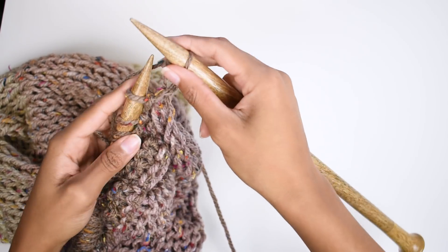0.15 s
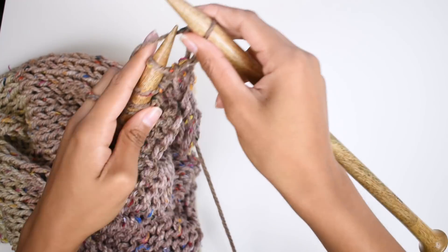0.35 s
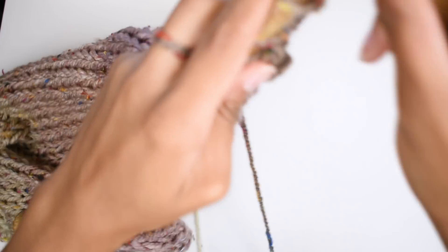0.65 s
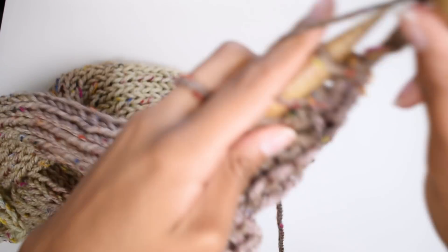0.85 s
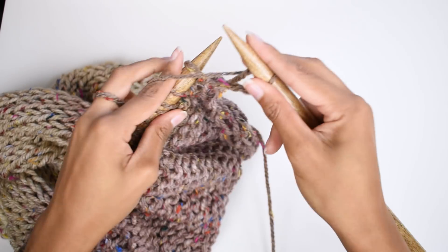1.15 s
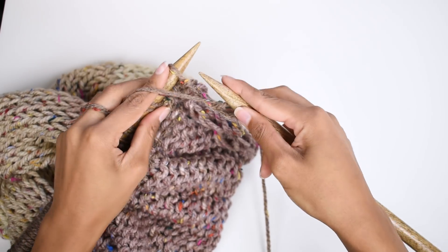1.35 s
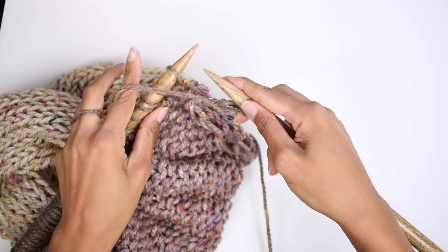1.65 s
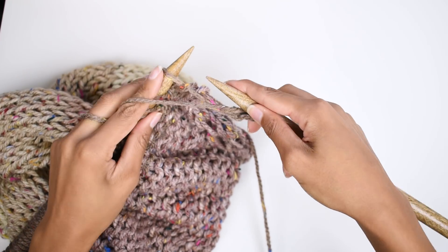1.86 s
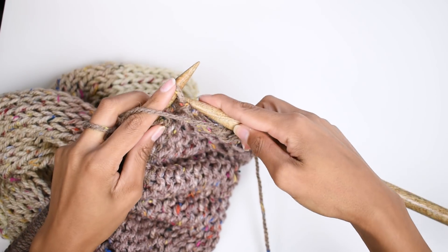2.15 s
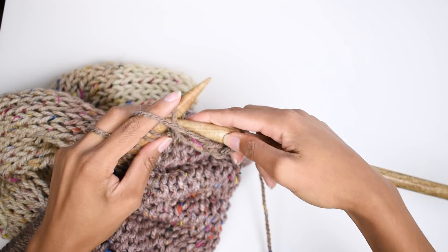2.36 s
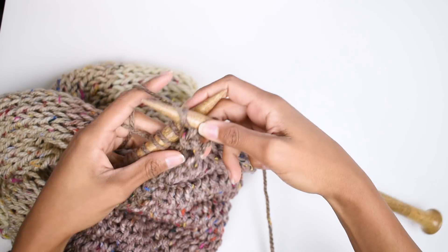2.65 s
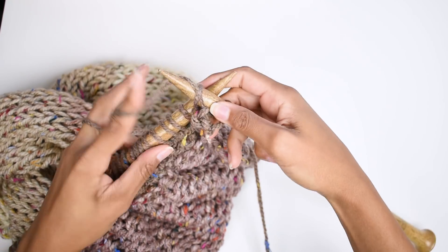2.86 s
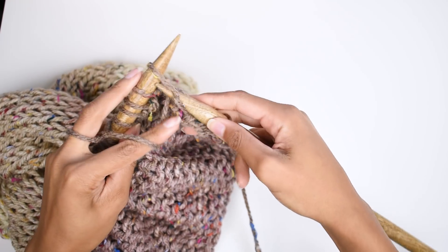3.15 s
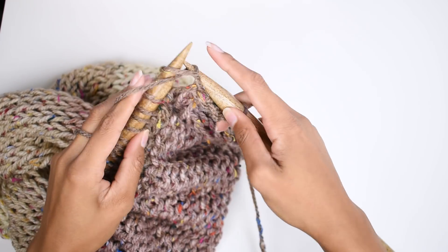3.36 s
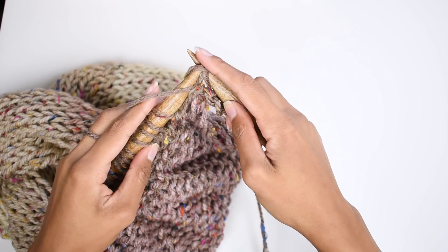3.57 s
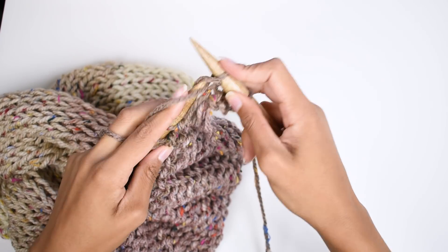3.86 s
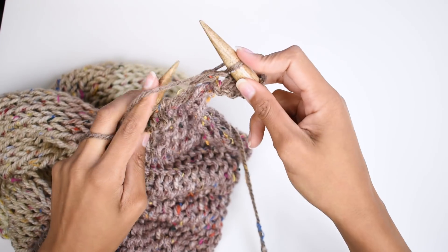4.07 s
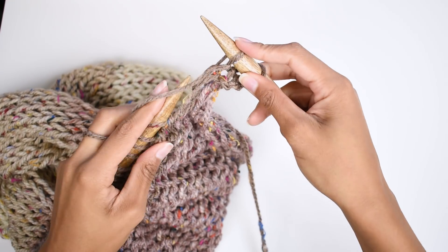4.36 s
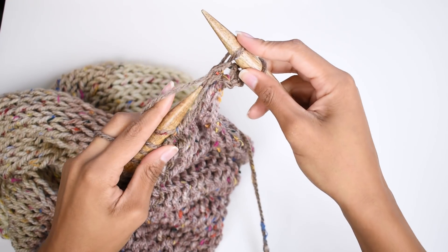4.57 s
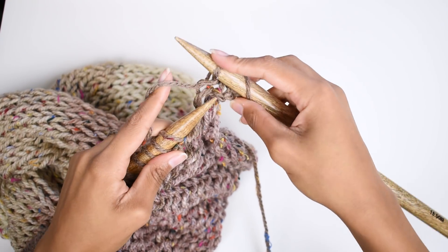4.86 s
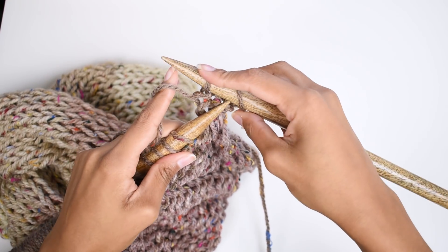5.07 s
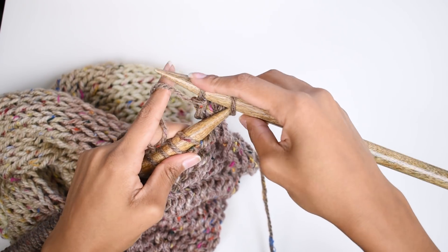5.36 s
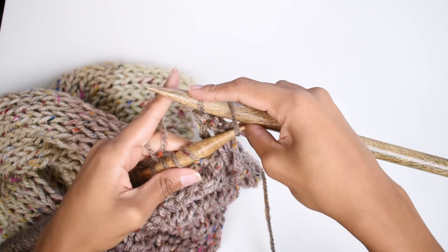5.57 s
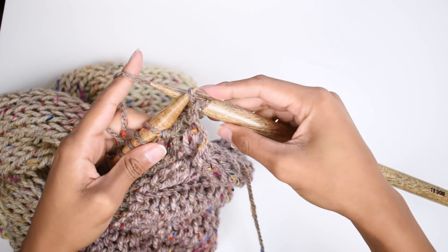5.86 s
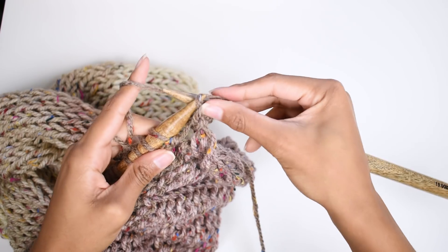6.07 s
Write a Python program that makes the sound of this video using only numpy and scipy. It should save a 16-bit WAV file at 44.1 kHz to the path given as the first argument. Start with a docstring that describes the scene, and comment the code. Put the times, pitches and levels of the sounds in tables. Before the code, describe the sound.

Thick wooden knitting needles knock and click irregularly, with hollow thumps on a table and faint swishes of yarn.

```python
"""Two thick wooden knitting needles at a table, close to the microphone in a small, quiet room.
First a tip clicks, yarn swishes over the wood, light ticks follow and the knitted cloth rustles.
From two seconds in the needles knock and slide: end knobs thump hollow on the table, tips and shafts click.
Near four seconds, blows cushioned by wool only thud; a knock and two faint ticks follow. After five
seconds come the last knocks, swishes and slides. Faint room rumble and microphone hiss lie under it all."""
import sys
import numpy as np
from scipy import signal
from scipy.fft import rfft, irfft, next_fast_len
from scipy.io import wavfile
from scipy.ndimage import map_coordinates

SR = 44100
rng = np.random.default_rng(int(sys.argv[2]) if len(sys.argv) > 2 else 0)


def inscribe(sig):
    """Save sig as 16-bit PCM at rate SR to the path in sys.argv[1].

    A 1-D sig is mono; a 2-D sig holds one channel per row.
    Samples are clipped to [-1, 1] before scaling.
    """
    pcm = np.round(np.clip(np.atleast_2d(sig).T, -1, 1) * 32767)
    wavfile.write(sys.argv[1], SR, pcm.astype(np.int16))


N = 273420

# Needles knock: end knobs thump hollow on the table, tips and shafts click.
# Each row: start in seconds, strength in dB, contact time in seconds, loss of the low modes in dB,
# favoured resonance in Hz, its boost in dB, seconds to the first rebound (0 for none).
NEEDLE_KNOCKS = [(0.434, -35, 0.000096, 8, 3240, 11, 0), (2.021, -17, .00018, 7.5, 885, 1.5, 0),
                 (2.689, -14.5, 0.00019, 8, 750, 6, 0), (3.1061, -21.5, 0.00013, 4.5, 600, 8, .0203),
                 (3.1094, -33, 0.00014, 2.5, 1130, 21, 0), (3.4304, -22, 0.000046, 33.5, 1230, 24, 0),
                 (3.705, -33.5, 0.0017, 4, 590, 2, 0), (3.821, -38.5, 0.002, 0, 142, 14.5, 0),
                 (3.994, -47.5, .0035, 0, 238, 7.5, 0), (4.2715, -24.5, 0.00011, 14, 1890, 7.5, .0398),
                 (5.3611, -34, 0.000046, 28, 1165, 21, 0), (5.6922, -13.5, 0.00016, 7, 765, 4, .0124),
                 (5.9205, -16.5, 0.000036, 37, 2370, 19, 0), (5.921, -32, 0.00068, 4, 674, 5, 0)]
# The hollow wooden ring of table and needles when struck.
# Each row: frequency in Hz, level in dB, seconds to fall by 60 dB.
WOOD_MODES = [(132, -27, 0.18), (239.2, -10, 0.098), (246, -16, 0.021), (436, -6, 0.017), (583, -29, 0.34),
              (620, 1, 0.032), (667, 12, 0.0062), (873.4, 6.5, 0.029), (867.4, -1, 0.058),
              (1000, -20.5, 0.073), (1297, -21, 0.028), (1553, -17, 0.029), (1955, -14.5, 0.021),
              (2240, -20, 0.032), (2460, -19, 0.0087), (3153, -13.5, 0.014), (3460, -17.5, 0.003),
              (4830, -31, 0.015), (4840, -25.5, 0.014), (6320, -32, 0.006)]
# A contact's force before its softness is counted. Each row: frequency in Hz, level in dB.
FORCE_SPECTRUM = [(60, -1), (150, 3.5), (240, 3.5), (750, -1.5), (1600, 2.5), (3000, -1.5), (5500, 0.5)]
# Tips and fingernails. Each row: start in seconds, level in dB, pitch in Hz, ring against scratch in dB.
TIP_TICKS = [(1.2342, -53.5, 4930, 6.5), (1.2352, -56, 3560, 4), (1.257, -54.5, 3160, -3),
             (1.2637, -53.5, 6900, -10), (1.289, -55, 3020, -13), (1.2916, -50.5, 5400, -2),
             (1.9925, -55, 5080, -6), (2.15, -58.5, 4900, -7), (4.793, -63, 3050, -8),
             (5.0515, -64, 6100, 9)]
# Shaft dragging on shaft. Each row: middle and length in seconds, hollow level and groan level in dB.
SHAFT_SLIDES = [(2.249, 0.06, -64, -59), (3.238, 0.088, -60.5, -68), (5.844, 0.1, -53.5, -65),
                (6.195, 0.11, -61, -73)]
# Yarn drawn over the wood. Each row: middle and length in seconds, level in dB.
YARN_PULLS = [(0.878, 0.022, -69), (0.965, 0.062, -72.5), (1.032, 0.029, -68.5), (1.307, 0.25, -75.5),
              (1.999, 0.039, -68), (2.485, 0.17, -66), (3.225, 0.09, -65), (3.516, 0.18, -72.5),
              (5.60, 0.065, -64.5), (5.832, 0.17, -68.5)]
# Resonances of a rubbed needle. Each row: frequency in Hz, width in octaves, level in dB.
RUBBED_MODES = [(2190, 0.052, 6), (3140, 0.067, -2), (4540, 0.052, 5.5), (6080, 0.035, 4),
                (7600, 0.024, -6)]
# Echoes off the table and walls. Each row: frequency in Hz, gain in dB.
ECHO_COLOUR = [(200, -6.5), (450, -6.5), (750, -14), (1400, -7), (2100, -14), (3000, -16.5), (6000, -10)]
# The small room's tail. Each row: frequency in Hz, seconds to fall by 60 dB.
ROOM_DECAY = [(150, 0.11), (400, 0.31), (700, 0.32), (1600, 0.46), (4000, 0.49), (10000, 0.11)]
# Room rumble and microphone hiss. Each row: frequency in Hz, relative noise density in dB.
ROOM_TONE_SPECTRUM = [(10, -16), (20, -2.5), (49, -5.5), (110, 0), (230, -4.5), (450, -7), (620, -9),
                      (1600, -17.5), (2400, -19.5), (3400, -17), (4800, -17), (7500, -22), (15800, -23.5)]
# The room tone's stereo image. Each row: frequency in Hz, likeness of left and right from 0 to 1.
STEREO_LIKENESS = [(60, 0.92), (150, 0.98), (380, 0.96), (950, 0.93), (2380, 0.75), (5980, 0.75),
                   (15000, 0.08)]

SOFT_SLOPE = 3.2  # how steeply the force falls above 1 / contact time
TIP_KNEE, TIP_SLOPE = 0.083, 4.8  # low modes are lost below this share of 1 / contact time, this steeply
FLIGHT_SHRINK, SHORTEST_FLIGHT_S = 0.41, 0.011  # each flight over the last; no rebound below the shortest
LOSSLESS_FLIGHT_S = 0.066  # a rebound's strength is its flight over this
REBOUND_THINS_DB = 9  # further loss of low modes in the weakest rebounds
REBOUND_SOFTENS = 0.1  # a weaker rebound stays longer in contact, by this power
CRACK_HZ, FIRM_CONTACT_S, CRACK_RISES = 2460, 0.00011, 0.15  # shorter contacts crack higher, by this power
PULL_HZ, PULL_S, PULL_BRIGHTENS = 5660, 0.046, 0.19  # shorter yarn pulls sound higher, by this power
CLOTH_MIDDLE_S, CLOTH_LENGTH_S, CLOTH_DB, CLOTH_HZ = 1.46, 0.38, -74.5, 1440
TOP_HZ = 15850


def needle_knocks(resonance_q=12, soften_hz=8000):
    """Close to the microphone, each contact rings the wood and cracks; the wood's give dulls the top."""
    track, t = np.zeros(N), np.arange(SR // 4) / SR
    for start, db, contact_s, low_loss_db, favoured_hz, boost_db, flight_s in NEEDLE_KNOCKS:
        crack_hz = CRACK_HZ * (FIRM_CONTACT_S / contact_s) ** CRACK_RISES
        for s, gain in bounces(start, flight_s):
            crack = amp(-22) * scratch(t, centre_hz=crack_hz, octaves=0.77, t60=0.034)
            wood = wood_ring(scatter_db=0.98, detune=0.003) + crack
            thinning_db = low_loss_db + REBOUND_THINS_DB * (1 - gain)
            pulse = amp(db) * gain * contact_force(contact_s / gain ** REBOUND_SOFTENS, thinning_db)
            blow = signal.fftconvolve(wood, pulse)
            # the point of contact picks out one resonance of the wood
            favoured = signal.lfilter(*signal.iirpeak(favoured_hz, resonance_q, SR), blow)
            blow += (amp(boost_db * gain) - 1) * favoured
            add(track, s, in_room(blow, late_db=-5.5))
    return signal.lfilter(*signal.butter(2, soften_hz, fs=SR), track)


def wood_ring(scatter_db, detune):
    """Table and needles ring hollow, a little differently each blow; neighbouring modes start opposed."""
    t = np.arange(SR // 4) / SR
    tuning = 1 + detune * rng.standard_normal()
    gains = amp(scatter_db * rng.standard_normal(len(WOOD_MODES)))
    return sum((-1) ** k * gains[k] * amp(db) * fade(t, t60) * np.sin(2 * np.pi * hz * tuning * t)
               for k, (hz, db, t60) in enumerate(WOOD_MODES))


def contact_force(contact_s, low_loss_db):
    """One contact's pulse: its duration limits the treble, its nearness to the tip thins the bass."""
    hz = np.geomspace(40, 16000, num=48)
    cycles = hz * contact_s
    softness_db = 10 * np.log10(1 + cycles ** SOFT_SLOPE)
    thinning_db = low_loss_db / (1 + (cycles / TIP_KNEE) ** TIP_SLOPE)
    return shortest_pulse(np.column_stack([hz, along(FORCE_SPECTRUM, hz) - softness_db - thinning_db]))


def bounces(s, flight_s, count=3):
    """Start and gain of a blow and of a loose needle's rebounds, which come ever sooner and weaker."""
    contacts = [(s, 1)]
    for flight in flight_s * FLIGHT_SHRINK ** np.arange(count):
        if flight > SHORTEST_FLIGHT_S:
            s += flight
            contacts.append((s, flight / LOSSLESS_FLIGHT_S))
    return contacts


def scratch(t, centre_hz, octaves, t60):
    """A dry, dying burst of noise as two surfaces meet and skid."""
    band = hump(np.fft.rfftfreq(len(t), 1 / SR), centre_hz, octaves)
    noise = irfft(rfft(rng.standard_normal(len(t))) * band, len(t))
    return unit(noise) * fade(t, t60)


def tip_ticks():
    """A tip touches: a dry scratch with more or less of a very short, high ring."""
    track, t = np.zeros(N), np.arange(SR // 20) / SR
    for s, db, hz, ring_db in TIP_TICKS:
        ring = amp(ring_db) * np.sin(2 * np.pi * hz * t) * fade(t, t60=0.025)
        tick = ring + scratch(t, centre_hz=hz, octaves=0.41, t60=0.01)
        add(track, s, amp(db) * in_room(tick, late_db=-5))
    return track


def shaft_slides():
    """Wood dragging on wood stirs a hollow resonance and a low groan."""
    hollow_swell = sum(amp(db) * stroke(s, length) for s, length, db, _ in SHAFT_SLIDES)
    groan_swell = sum(amp(db) * stroke(s, length) for s, length, _, db in SHAFT_SLIDES)
    rub = friction(catch_hz=250, grain_db=-1)
    hollow = filtered(rub, lambda hz: hump(hz, 640, 0.11) + amp(-11) * hump(hz, 790, 0.61))
    groan = filtered(rub, lambda hz: hump(hz, 230, 0.036))
    return hollow_swell * unit(hollow) + groan_swell * unit(groan)


def yarn_swishes():
    """Wool fibres brush the needles and stir their high resonances; a quicker pull sounds higher."""
    track = np.zeros(N)
    fibres = filtered(friction(catch_hz=570, grain_db=2), rubbed_needle)
    for s, length, db in YARN_PULLS:
        centre_hz = PULL_HZ * (PULL_S / length) ** PULL_BRIGHTENS
        swish = filtered(fibres, lambda hz: hump(hz, centre_hz, octaves=0.95))
        track += amp(db) * stroke(s, length) * unit(swish)
    return track


def rubbed_needle(hz):
    """The gain that a needle's resonances give to friction on its surface."""
    return 1 + sum(amp(db) * hump(hz, mode_hz, octaves) for mode_hz, octaves, db in RUBBED_MODES)


def cloth_rustle():
    """The knitted piece rustles softly as the hands settle."""
    rustle = filtered(friction(catch_hz=120, grain_db=2.5), lambda hz: hump(hz, CLOTH_HZ, octaves=0.7))
    return amp(CLOTH_DB) * stroke(CLOTH_MIDDLE_S, CLOTH_LENGTH_S) * unit(rustle)


def friction(catch_hz, grain_db):
    """Noise whose strength jumps as the surfaces catch and let go."""
    catches = rng.standard_normal(int(N * catch_hz / SR) + 4)
    grip = map_coordinates(catches, [np.arange(N) * catch_hz / SR])
    return unit(rng.standard_normal(N) * amp(grain_db * grip))


def stroke(s, length):
    """A hand movement swells and dies away around second s."""
    return np.exp(-np.pi * ((np.arange(N) / SR - s) / length) ** 2)


def in_room(sound, late_db, early_t60=0.13, delay_s=0.009):
    """The microphone hears the direct sound, then echoes off the table and near walls, and a tail."""
    hz, frame_s, spectra = signal.stft(rng.standard_normal(SR // 2), SR, nperseg=256)
    _, tail = signal.istft(spectra * fade(frame_s, along(ROOM_DECAY, hz)[:, None]), SR, nperseg=256)
    early = rng.standard_normal(len(tail)) * fade(np.arange(len(tail)) / SR, early_t60)
    echoes = early / np.linalg.norm(early) + amp(late_db) * tail / np.linalg.norm(tail)
    echoes = signal.fftconvolve(echoes, shortest_pulse(ECHO_COLOUR))
    return signal.fftconvolve(sound, np.concatenate([[1], np.zeros(round(delay_s * SR)), echoes]))


def room_tone(level_db=-64.5):
    """The room's rumble is nearly the same left and right; the microphone's top hiss is each side's own."""
    def mid_side_gains(hz):
        spread = np.arccos(np.clip(along(STEREO_LIKENESS, hz), 0, 1)) / 2
        return amp(along(ROOM_TONE_SPECTRUM, hz)) * np.array([np.cos(spread), np.sin(spread)])

    mid, side = filtered(rng.standard_normal((2, N)), mid_side_gains)
    return amp(level_db) * unit(np.array([mid + side, mid - side]))


def amp(db):
    """Decibels to gain."""
    return 10 ** (np.asarray(db) / 20)


def unit(x):
    """x at rms 1."""
    return x / np.sqrt(np.mean(x ** 2) + 1e-20)


def along(points, hz):
    """Rows of frequency and value, read at hz on a log axis."""
    frequencies, values = np.transpose(points)
    return np.interp(np.log(hz + 1), np.log(frequencies + 1), values)


def hump(hz, centre_hz, octaves):
    """A bell-shaped band on a log axis."""
    return np.exp(-0.5 * (np.log2((hz + 1) / centre_hz) / octaves) ** 2)


def fade(t, t60):
    """A decay of 60 dB in t60 seconds."""
    return np.exp(-np.log(1000) * t / t60)


def add(track, s, sound):
    """Mix a sound into the track from second s."""
    part = track[round(s * SR):][:len(sound)]
    part += sound[:len(part)]


def filtered(x, response):
    """x through a filter whose gain is response(hz)."""
    size = next_fast_len(N + SR // 2)
    return irfft(rfft(x, size) * response(np.fft.rfftfreq(size, 1 / SR)), size)[..., :N]


def shortest_pulse(points, size=2048):
    """The shortest causal pulse with a spectrum given as rows of Hz and dB."""
    cepstrum = irfft(np.log(amp(along(points, np.fft.rfftfreq(size, 1 / SR)))))
    cepstrum[1:size // 2] *= 2
    cepstrum[size // 2 + 1:] = 0
    return irfft(np.exp(rfft(cepstrum)))


def scene():
    """The hands work close up and dead centre, with the room tone around them."""
    return needle_knocks() + tip_ticks() + shaft_slides() + yarn_swishes() + cloth_rustle() + room_tone()


def record(dry):
    """The recorder keeps nothing above its band limit."""
    return filtered(dry, lambda hz: hz < TOP_HZ)


dry = scene()
out = record(dry)
inscribe(out)
```